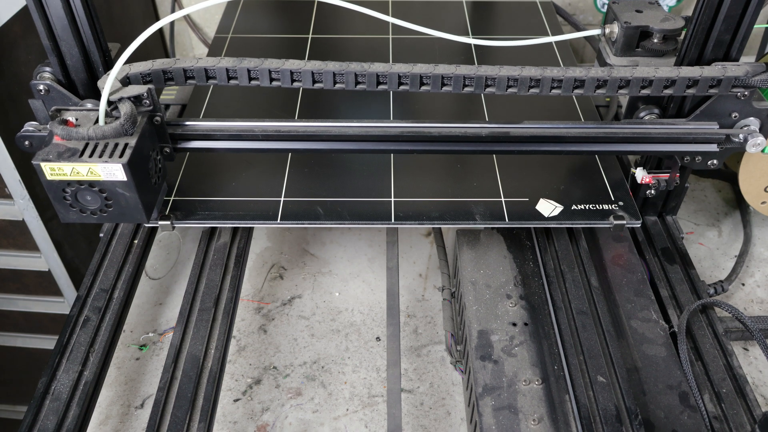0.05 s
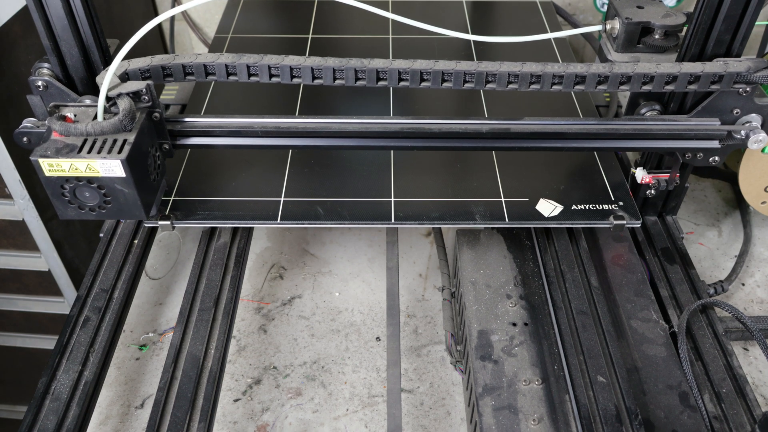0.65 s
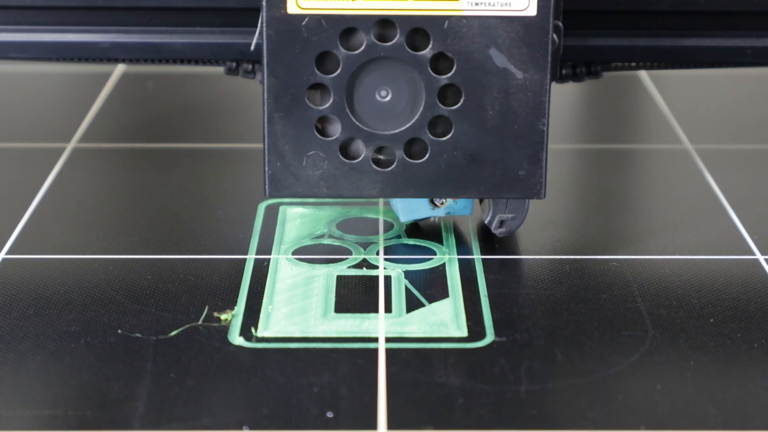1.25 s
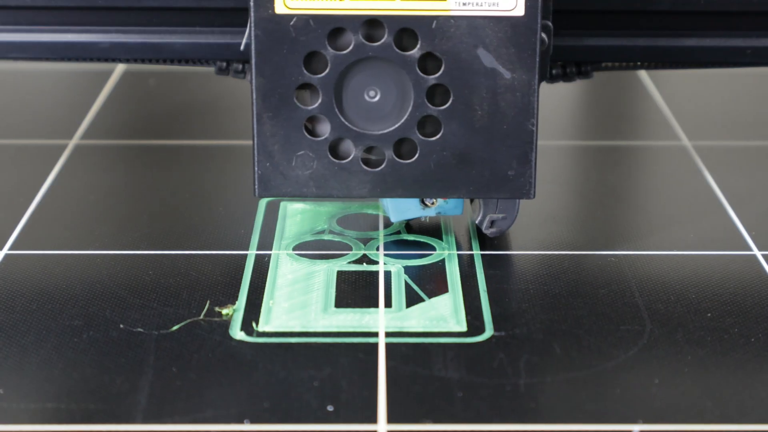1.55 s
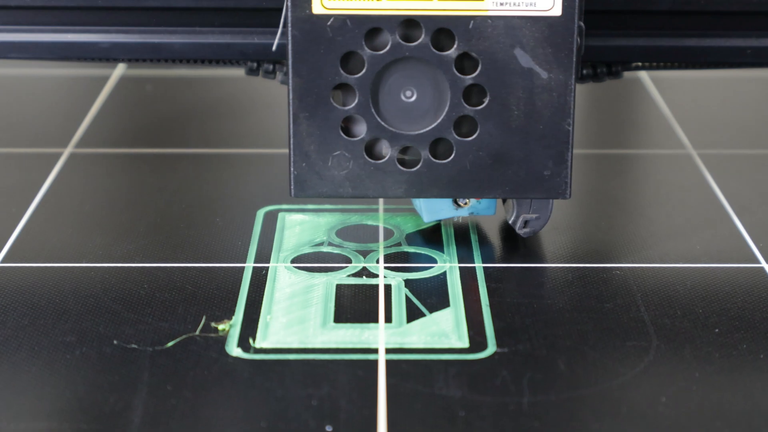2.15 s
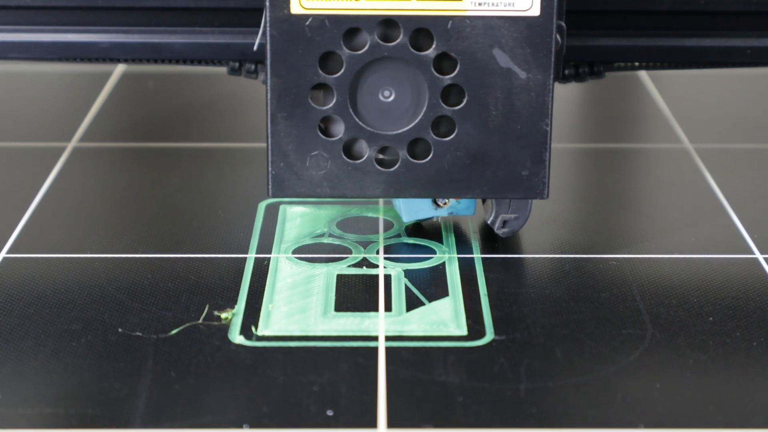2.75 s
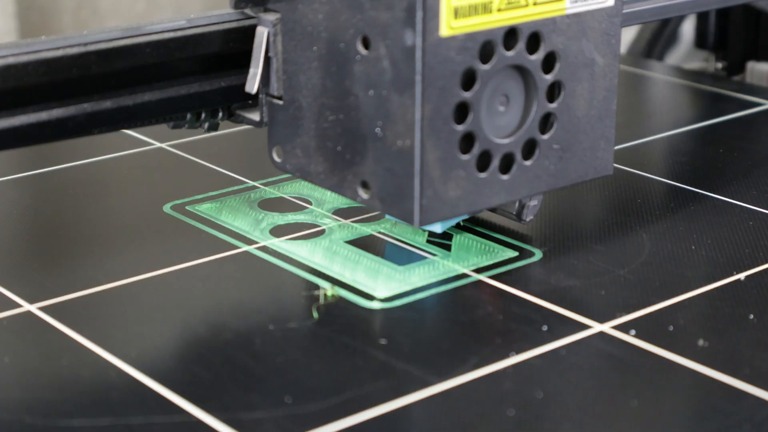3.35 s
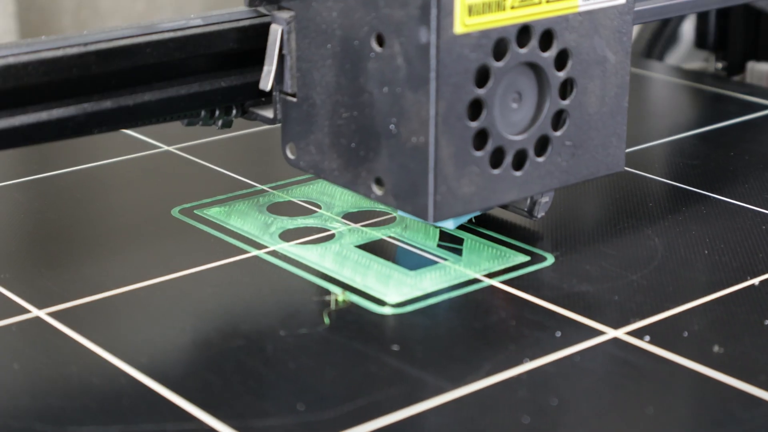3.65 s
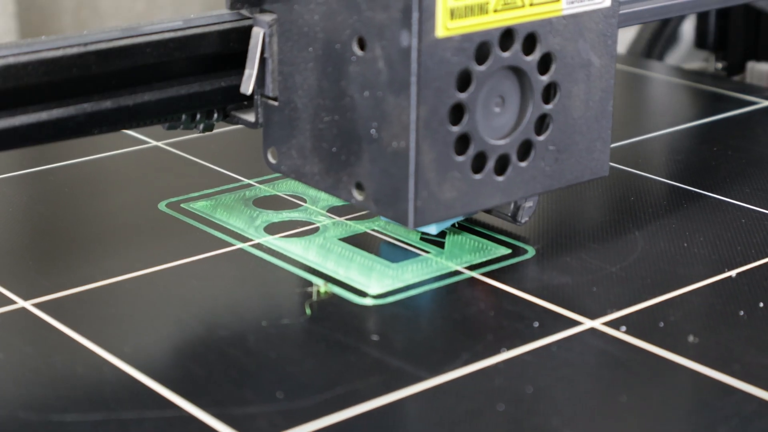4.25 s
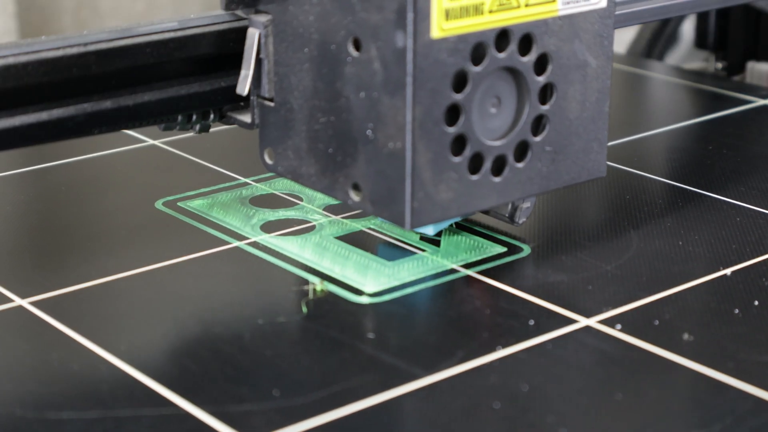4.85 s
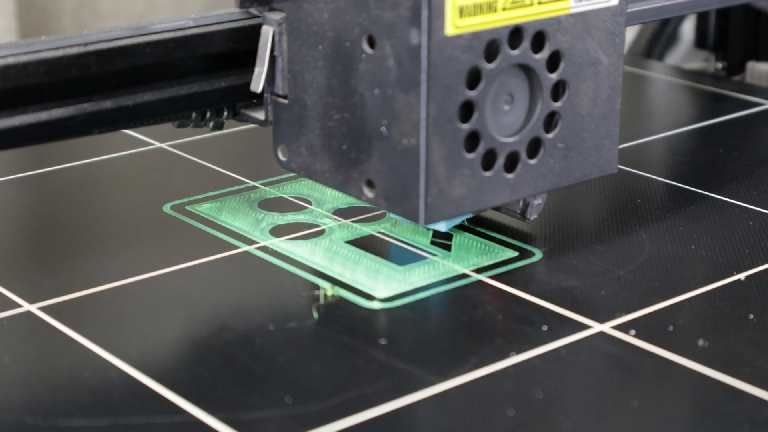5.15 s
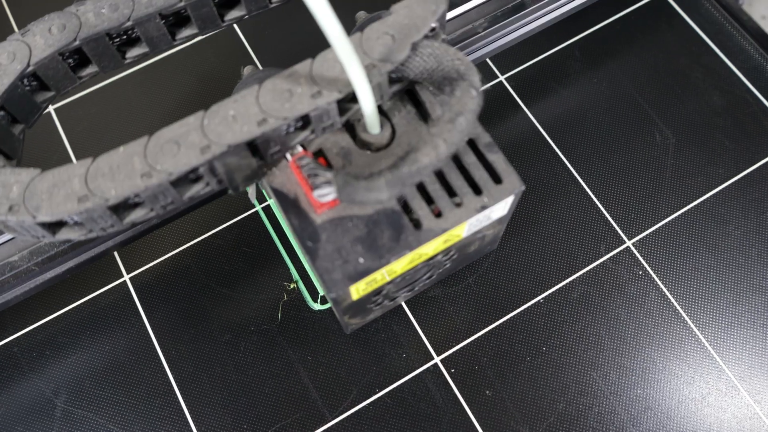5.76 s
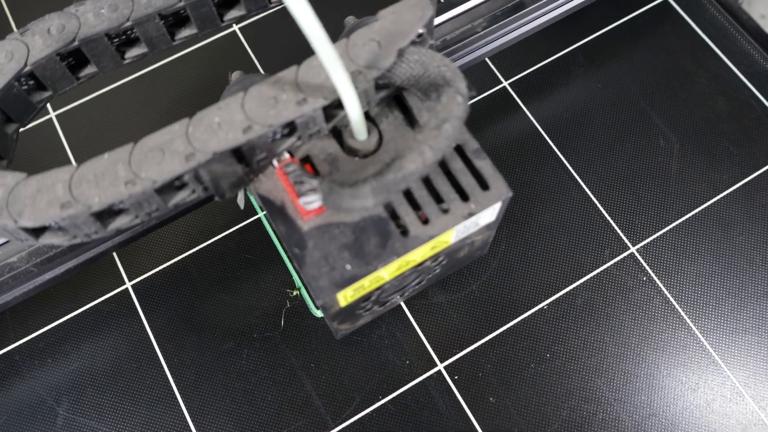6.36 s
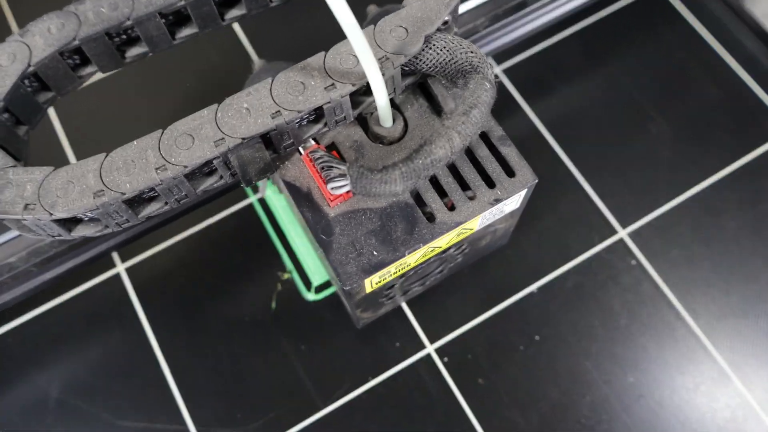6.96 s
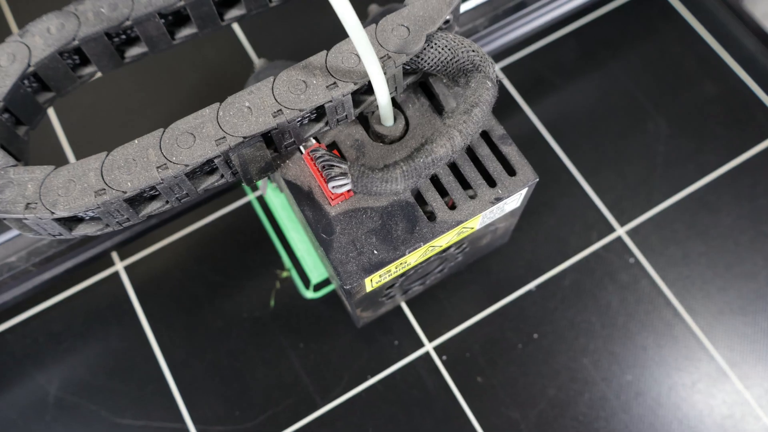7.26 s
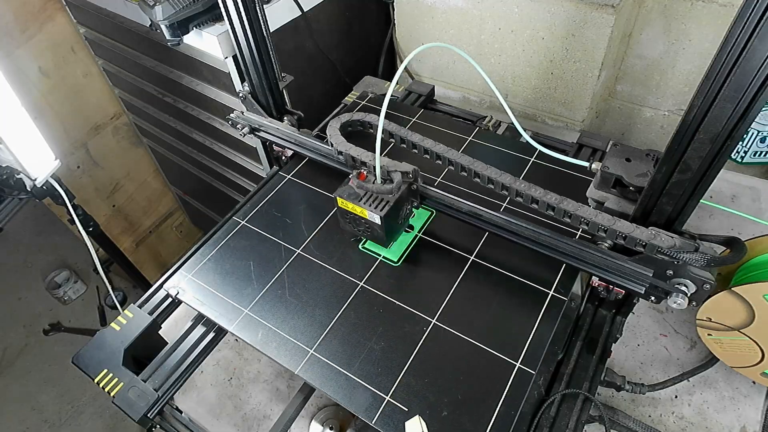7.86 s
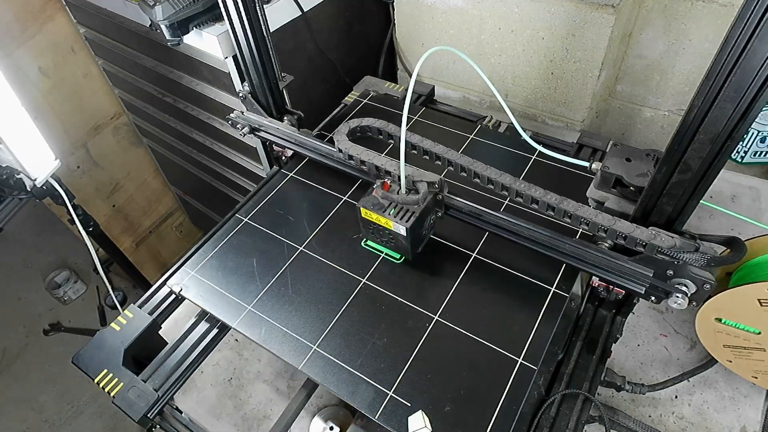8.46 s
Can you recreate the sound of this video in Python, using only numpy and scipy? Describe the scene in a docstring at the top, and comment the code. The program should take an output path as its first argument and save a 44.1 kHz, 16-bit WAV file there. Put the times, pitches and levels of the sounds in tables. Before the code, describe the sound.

A desktop 3D printer works indoors, heard up close, its cooling fans humming and rushing throughout over a low frame rumble. It opens with one fast move of the print head: a high, steady whine that grows louder, with a dull clunk at about 0.55 seconds. At 1 second the whine drops in pitch and ends in a juddering squeak with a brief metallic ring. From 1.2 seconds two stepper motors drone through slow strokes under a thin high whine, dipping at each turn. Loose parts tick unevenly and the housing buzzes faintly. Short chirps and soft knocks mark turns, clearest around 1.6, 5.4, 6.3 and 7.3 seconds. The tone shifts abruptly at 1.2, 3.2 and 5.4 seconds as the listening position changes, with the drone fullest in the last stretch. At 7.8 seconds everything cuts off, leaving silence.

```python
"""A desktop 3D printer at work, its cooling fans humming and rushing all along. First the print head makes one
fast, whining move, clunks halfway and brakes with a squeak at 1 s. From 1.2 s two stepper motors (motors that
turn in tiny jumps) drone through slow strokes and shake the frame; loose parts tick, and the turns bring chirps
and knocks. We listen from four spots, moving on at 1.2, 3.2 and 5.4 s. At 7.8 s the sound breaks off and
silence follows."""
import sys
import numpy as np
from scipy import signal
from scipy.fft import rfft, irfft, next_fast_len
from scipy.io import wavfile
from scipy.ndimage import map_coordinates

SR = 44100
rng = np.random.default_rng(int(sys.argv[2]) if len(sys.argv) > 2 else 0)


def wav_record(signal):
    """Record a signal, one row per channel, as 16-bit PCM in the file named by sys.argv[1]."""
    frames = np.transpose(np.atleast_2d(signal))
    bounded = np.clip(frames, -1, 1)
    # unit amplitude maps onto the largest positive 16-bit level
    quanta = np.round(bounded * 32767).astype(np.int16)
    wavfile.write(sys.argv[1], SR, quanta)


N = 383669

MAIN_STEP_HZ, CROSS_STEP_HZ, TRAVEL_STEP_HZ = 88.35, 141.2, 149.5  # full motor steps a second
MICROSTEPS = 16  # tiny jumps in one full step
BRAKE_AT_S, BRAKE_TAKES_S = .96, .125


# the main motor's low tones: multiple of the step rate, level/dB at spots 2, 3, 4
MAIN_TONES = [(2, -55.5, -62, -53), (3, -52, -53, -42), (4, -51, -50, -44), (5, -53, -65, -53.5),
              (6, -77, -61.5, -58)]
# moments when its fourth harmonic fades: t/s, half width/s, drop/dB
FOURTH_FADES = [(3.78, .15, 10), (4.8, 0.09, 5.5), (5.07, .08, 13), (5.72, 0.13, 16), (6.42, 0.08, 9),
                (6.6, 0.086, 2), (7.2, 0.1, 6)]
# the head slows to turn around: t/s, half width/s, motor drop/dB, hiss drop/dB
TURNAROUNDS = [(1.645, 0.042, 5, 0.5), (2.385, 0.026, 9, 4.5), (3.16, 0.031, 19, 1), (3.85, 0.063, 5, 0),
               (4.72, .05, 3, -1), (5.39, 0.028, 13, 2.5), (6.33, 0.045, 3, 4.5), (7.265, 0.036, 8, 3)]

def main_motor():
    """The main motor drones and whines, getting quieter as the head slows at the end of each stroke."""
    dip_db = bumps((s, width, drop) for s, width, drop, _ in TURNAROUNDS)
    drone = stepper_drone(MAIN_STEP_HZ, MAIN_TONES, drift=.0013, waver_db=1.5,
                          fourth_db=-bumps(FOURTH_FADES))
    return (drone + microstep_whine()) * amp(-dip_db)


# the crosswise motor's tones: multiple of the step rate, level/dB at spots 2, 3, 4
CROSS_TONES = [(1, -63, -56.5, -56), (2, -62.5, -62, -50), (3, -70, -60.5, -58.5), (4, -71, -60, -58),
               (16, -83.5, -81.5, -64.5)]
# diagonal strokes: start/s, end/s, fade-out/s, boost of the lowest tone/dB
DIAGONALS = [(5.52, 5.975, 0.1, 9.5), (6.452, 7.04, 0.443, 11)]

def cross_motor(attack_s=.1):
    """The motor for the crosswise direction drones harder on diagonal strokes."""
    load_db = sum(db * (ramp(start, attack_s) - ramp(end, fade)) for start, end, fade, db in DIAGONALS)
    return stepper_drone(CROSS_STEP_HZ, CROSS_TONES, drift=.00201, waver_db=1, load_db=load_db)


def stepper_drone(step_hz, tones, drift, waver_db, load_db=0, fourth_db=0):
    """Even steps make harmonics, tones at whole multiples of the step rate; the third wavers least."""
    phase = phase_of(step_hz * (1 + drift * wobble(7)))
    out = np.zeros((2, N))
    for k, *levels in tones:
        waver = waver_db * wobble(6) / (2 if k == 3 else 1)
        gain = spot_gain([-np.inf] + levels) * amp(waver + load_db / k ** 2 + fourth_db * (k == 4))
        out += tone(k * phase + rng.uniform(0, 2 * np.pi), k * step_hz, gain)
    return out


# the whine of each stroke: start/s, level/dB at 1, 2, 3, 4, 5 times the microstep rate
STROKE_WHINES = [(1.22, -61, -62.5, -65, -63.5, -85), (1.645, -64, -64, -64, -61, -85),
                 (2.385, -70.5, -65, -59, -63, -85), (3.16, -69.5, -60, -62.5, -63, -70),
                 (3.85, -61, -61.5, -62, -62.5, -72), (4.72, -64.5, -60, -65, -63, -73),
                 (5.39, -57.5, -63, -64.5, -71.5, -85)]

def microstep_whine(drift=.000494, flutter=.00093, waver_db=1.1, rough_db=2):
    """The main motor's tiny jumps sing high up, with a new mix of harmonics on each stroke."""
    hz = MICROSTEPS * MAIN_STEP_HZ
    phase = phase_of(hz * (1 + drift * wobble(7) + flutter * wobble(90)))
    starts, *levels = np.transpose(STROKE_WHINES)
    stroke = np.searchsorted(starts, np.arange(N) / SR)
    out = np.zeros((2, N))
    for k, db in enumerate(levels, 1):
        gain = np.append(0, amp(db))[stroke]  # silent before the first stroke
        out += tone(k * phase, k * hz, gain * amp(waver_db * wobble(6) + rough_db * wobble(50)))
    return out


# tones around the fast move's whine: multiple of the step rate, level/dB
TRAVEL_TONES = [(1, -57), (3, -59), (6, -63.5), (15, -60.5), (17, -63), (18, -70), (19, -67.5), (31, -74.5),
                (32, -52.5), (33, -81), (34, -75), (47.75, -60.5), (48, -58.5), (48.25, -70), (50, -70.5)]
# the whine swells and dips as the gantry (the head's rail) resonates: t/s, half width/s, change/dB
WHINE_SWELLS = [(.11, .055, -10), (.215, 0.022, 5), (.28, .04, -9), (.41, .04, -1), (.545, .028, 3.5),
                (.595, .04, 5.5), (.76, .05, -3.5), (.85, .05, -2.5), (.96, .035, 5.5)]

def fast_move(whine_db=-53.5, growth_db_per_s=8, waver_db=1.8, judder=.012, judder_db=2):
    """A racing motor whines; as the head brakes, the pitch falls, judders and squeaks."""
    speed, braking = travel_speed(), ramp(BRAKE_AT_S, BRAKE_TAKES_S / 10)

    def shake():
        jolts = rng.standard_normal(N // 50 + 2)
        return braking * map_coordinates(jolts, [np.arange(N) / 50], order=1)

    step_hz = TRAVEL_STEP_HZ * speed * (1 + .00036 * wobble(12) + judder * shake())
    phase = phase_of(step_hz)
    drive = speed ** 2.6 * amp(judder_db * shake())  # slower is much quieter
    past_middle_s = np.minimum(np.arange(N) / SR, BRAKE_AT_S) - BRAKE_AT_S / 2
    level_db = whine_db + growth_db_per_s * past_middle_s + bumps(WHINE_SWELLS) + waver_db * wobble(12)
    microstep_hz = MICROSTEPS * step_hz
    # the falling whine sweeps through a sharp resonance of the carriage that holds the head
    squeak_hz, squeak_width_hz = 1930, 76
    squeak = 1 + amp(11) / (1 + ((microstep_hz - squeak_hz) / squeak_width_hz) ** 2)
    out = tone(MICROSTEPS * phase, microstep_hz[0], drive * squeak * amp(level_db))
    octave_db = 4.5 * (ramp(.32, .08) - 1)  # the whine's octave starts soft, then firms up
    overtone_db = -5.5 * braking  # tones above the whine drop once braking starts
    for k, db in TRAVEL_TONES:
        change_db = octave_db * (k == 2 * MICROSTEPS) + overtone_db * (k > MICROSTEPS)
        gain = drive * amp(db + change_db + .5 * wobble(11))
        out += tone(k * phase + rng.uniform(0, 2 * np.pi), k * TRAVEL_STEP_HZ, gain)
    return out


def travel_speed():
    """The fast move's speed: 1 while cruising, then falling evenly to 0."""
    return 1 - ramp(BRAKE_AT_S, BRAKE_TAKES_S)


# the gantry's ringing notes: t/s, f/Hz, level/dB, time to fade by 60 dB/s
GANTRY_NOTES = [(0.97, 4785, -58, .5), (.965, 2392, -52, .4), (.995, 1890, -46, .2), (1, 8000, -57.5, .15)]

def gantry_ring(rise_s=.008):
    """The gantry rings on briefly after the braking whine has swept past its notes."""
    out, t = np.zeros((2, N)), np.arange(SR // 5) / SR
    for s, hz, db, t60 in GANTRY_NOTES:
        add_at(out, s, tone(2 * np.pi * hz * t, hz, amp(db) * strike(t, rise_s, t60)))
    return out


# tone colour of the clunk: f/Hz, relative level/dB
CLUNK_COLOUR = [(350, -2), (550, 0), (880, -2), (1200, -11.5), (2500, -8), (5000, -18.5), (12000, -23.5)]

def clunk(at_s=.556, db=-32.5):
    """Halfway through the fast move something, likely the cable chain, flops with a dull rattle."""
    out, t = np.zeros((2, N)), np.arange(SR // 3) / SR
    add_at(out, at_s, amp(db) * noise(len(t), CLUNK_COLOUR, 300, 13000) * strike(t, rise_s=.019, t60=.25))
    return out


# short motor moves, plus the clunk's ringing body at 0.546 s: t/s, length/s, start f/Hz, end f/Hz, level/dB
CHIRPS = [(0.546, 0.033, 900, 890, -48.5), (1.001, .12, 403, 365, -49.5), (1.03, .19, 165.5, 150, -50.5),
          (1.635, 0.047, 470, 498, -41), (1.661, 0.058, 255, 250, -40), (2.252, 0.076, 380, 272, -47),
          (5.355, 0.075, 249, 262, -37.5), (5.385, 0.061, 484, 503, -39.5), (5.435, 0.055, 408, 390, -44.5),
          (5.441, .055, 240, 255, -43), (6.238, 0.1096, 490.6, 244, -43.5), (6.35, 0.06, 250, 262, -39),
          (7.196, 0.077, 256.5, 248, -36.5), (7.236, .045, 478, 460, -40.5), (7.265, 0.06, 445, 393, -36),
          (7.284, .05, 248, 260, -38.5)]

def motor_chirps():
    """On short moves, mostly at the turns, a motor chirps through the frame's resonances."""
    out = np.zeros((2, N))
    for s, length, start_hz, end_hz, db in CHIRPS:
        size = round(length * SR)
        swell = amp(db) * signal.windows.tukey(size, .7)
        add_at(out, s, tone(phase_of(np.linspace(start_hz, end_hz, size)), start_hz, swell))
    return out


# knocks of belt and carriage: t/s, tick level/dB, thump level/dB, time to fade by 60 dB/s
KNOCKS = [(.474, -60, -36, 0.08), (2.415, -45, -39, 0.16), (3.883, -44.5, -38.5, 0.42),
          (4.683, -38, -37, 0.064), (5.39, -60, -34, 0.17), (5.432, -42.5, -38, 0.11),
          (6.297, -56, -34.5, .26), (7.266, -36.5, -39, .11), (7.285, -46, -32.5, 0.12)]
# tone colours of a knock's tick and thump: f/Hz, relative level/dB
TICK_COLOUR = [(600, -3), (1600, 1), (2500, -11), (3650, -2), (5500, -13.5), (15000, -28.5)]
THUMP_COLOUR = [(40, -38.5), (75, -17.5), (110, -1), (260, 1.5), (450, -4.5), (800, -33.5), (3000, -62)]

def belt_knocks():
    """Belt and carriage knock: a bright tick and a low thump that die away together."""
    out, t = np.zeros((2, N)), np.arange(SR // 4) / SR
    for s, tick_db, thump_db, t60 in KNOCKS:
        tick = amp(tick_db) * noise(len(t), TICK_COLOUR, 500, 15000)
        thump = amp(thump_db) * noise(len(t), THUMP_COLOUR, 40, 3000)
        add_at(out, s, (tick + thump) * strike(t, rise_s=.00049, t60=t60))
    return out


# the notes that loose parts ring at: f/Hz, width/Hz, relative level/dB
LOOSE_PART_NOTES = [(1450, 60, -2), (1970, 90, -5), (2920, 80, -1), (3500, 90, 0), (3820, 80, -9),
                    (4530, 90, -7)]
# clear ticks: t/s, level/dB before the trim, leading f/Hz
CLEAR_TICKS = [(1.2894, -40.5, 2870), (1.6594, -39, 3510), (2.1395, -41.5, 2850), (2.497, -37.5, 3560),
               (2.570, -37, 3600), (2.655, -41, 3420), (2.8494, -39, 2850), (2.932, -38.5, 2980),
               (3.062, -39, 3430), (3.132, -38, 3520), (3.372, -38, 3590), (3.505, -41, 3700),
               (3.657, -39.5, 3630), (3.8935, -36, 3680), (4.1994, -36, 3700), (4.68, -37, 3650),
               (4.9576, -37, 2800), (5.497, -39.5, 3520), (6.121, -32.5, 2940), (6.5016, -39, 2900),
               (6.732, -36, 2930), (6.995, -39, 3480), (7.082, -39, 3500), (7.152, -37, 3480),
               (7.3377, -37, 2890), (7.425, -42, 3550), (7.63, -36, 3500)]
# the softer patter: level/dB before the trim at spots 2, 3, 4
PATTER_DB = [-46.5, -45.5, -41.5]

def carriage_rattle(patter_per_s=26, scatter_db=2, detune=.015, trim_db=-9, bounce_db=-6):
    """Loose parts of the carriage hit, ring and bounce once: clear ticks over an uneven patter."""
    rise_s, t60 = .00092, .085
    out, t = np.zeros((2, N)), np.arange(SR // 10) / SR
    hz = np.geomspace(1000, 10000, 400)
    times = SPOT_TIMES[1] + np.cumsum(rng.uniform(.3, 1.7, 300)) / patter_per_s
    offsets_db = scatter_db * rng.standard_normal(len(times))
    patter = [(s, PATTER_DB[np.searchsorted(SPOT_TIMES, s) - 2] + db, None)
              for s, db in zip(times, offsets_db) if s < SPOT_TIMES[-1]]
    for s, db, lead_hz in list(CLEAR_TICKS) + patter:
        notes = [(f * (1 + detune * rng.normal()), width, level + scatter_db * rng.normal())
                 for f, width, level in LOOSE_PART_NOTES]
        if lead_hz:
            notes.append((lead_hz, 80, 4))  # one extra, stronger note
        ring = noise(len(t), resonances(notes, hz), 1200, 9000)
        flight_s = .012 * rng.uniform(.5, 2)
        bounce = amp(bounce_db) * strike(np.maximum(t - flight_s, 0), rise_s, t60)
        add_at(out, s, amp(db + trim_db) * (strike(t, rise_s, t60) + bounce) * ring)
    return out


# resonances of the head's housing: f/Hz, width/Hz, relative level/dB
HOUSING_NOTES = [(1450, 70, 0.5), (1660, 110, -3), (1970, 60, -3), (2930, 150, 0), (3470, 190, -2),
                 (4480, 220, -8)]
# its buzz: level/dB at spots 1-4
BUZZ_DB = [-78, -66, -59.5, -56]

def housing_buzz(chatter_db=2.5):
    """The motor steps shake the head's housing, which buzzes unevenly."""
    body = noise(N, resonances(HOUSING_NOTES, np.geomspace(1000, 6000, 300)), 1200, 4800)
    return body * spot_gain(BUZZ_DB) * puffs(CROSS_STEP_HZ, depth=1.2) * amp(chatter_db * wobble(45))


# tone colour of the rumble: f/Hz, relative level/dB at spots 1-4
RUMBLE_COLOUR = [(25.05, -102, -95, -95, -96), (41.8, -86.5, -82, -86.5, -89),
                 (81.5, -79.5, -73, -70.5, -79), (102, -66, -66.5, -68.5, -66.5),
                 (156.5, -74, -71, -72.5, -72.5), (230, -74.5, -72, -71, -72),
                 (335, -74.5, -70, -72.5, -64.5), (470, -74, -68.5, -69.5, -64),
                 (540, -76.5, -72, -73, -70.5), (934, -81.5, -73, -75.5, -77.5)]
# the whole rumble: level/dB at spots 1-4
RUMBLE_DB = [-45.5, -42.5, -42.5, -42]

def frame_rumble(shake_db=.7):
    """Belts and rollers rumble through the frame."""
    return spot_gain(RUMBLE_DB) * amp(shake_db * wobble(30)) * spot_noise(RUMBLE_COLOUR, 24, 876)


# steady tones of fans and housing: f/Hz, level/dB at spots 1-4
FAN_TONES = [(55.3, -60.5, -60.5, -64, -63), (108.7, -57, -55.5, -63.5, -56), (192, -57.5, -55.5, -66, -57),
             (313.2, -57, -61.5, -65.5, -54.5), (322.4, -62, -57, -58.5, -61),
             (467.8, -65, -56, -53, -48.5), (731.3, -55, -58, -51.5, -77), (755, -83.5, -70, -76.5, -62),
             (1066, -81, -58, -59, -87.5), (1301, -73.5, -62.5, -64, -67), (1520, -77, -56.5, -82, -69),
             (1598, -84, -55, -83.5, -78.5), (1624, -59, -81.5, -61, -77), (1890, -67.5, -61.5, -60, -57.5),
             (1946, -57.5, -73, -79, -84), (2270, -85.5, -74, -73.5, -68), (3720, -91.5, -80.5, -66, -81.5),
             (3950, -86, -92.5, -78, -66), (4204, -76, -77.5, -64, -84.5)]
# faint upper fan tones, each heard from one spot: spot (1-4), f/Hz, level/dB
FAN_OVERTONES = [(1, 851, -65), (1, 1238, -67), (1, 1443, -62), (1, 1647, -64), (1, 2078, -66),
                 (3, 3391, -69.5), (3, 3677, -65), (3, 3919, -67.5), (4, 1044, -67), (4, 1610, -68),
                 (4, 1976, -67), (4, 3801, -71), (4, 4522, -71)]

def fan_hum(drift_hz=.73, overtone_drift_hz=2, waver_db=1.26):
    """The spinning fans hum; each tone drifts and wavers a little on its own."""
    out = np.zeros((2, N))
    for hz, *levels in FAN_TONES:
        phase = phase_of(hz + drift_hz * wobble(5))
        out += tone(phase, hz, spot_gain(levels) * amp(waver_db * wobble(5.5)))
    for spot, hz, db in FAN_OVERTONES:
        part = spot_slice(round(spot))
        phase = phase_of(hz + overtone_drift_hz * wobble(12)[part])
        out[:, part] += tone(phase, hz, amp(db + waver_db * wobble(5.5)[part]))
    return out


# tone colour of the moving air: f/Hz, relative level/dB at spots 1-4
AIR_COLOUR = [(900, -82.5, -79, -75.5, -77), (1200, -80.5, -77, -78, -81), (1600, -82, -78, -76.5, -76.5),
              (1900, -81, -73.5, -71.5, -79), (2230, -82, -78, -78, -77.5), (2570, -89.5, -83, -82, -82),
              (2970, -86, -82.5, -82, -81), (3140, -89.5, -83, -83.5, -82.5),
              (3430, -87.5, -83, -82, -84.5), (4460, -91.5, -85, -83.5, -84.5),
              (5170, -92, -87, -85.5, -90.5), (8500, -95, -89, -89, -93), (11500, -99, -91, -93, -96.5),
              (15500, -100.5, -93.5, -95, -96.5)]
# the fans' rush and the jet's hiss: base level/dB at spots 1-4
RUSH_DB = [-48, -46.5, -45, -48]
HISS_DB = [-58, -55, -53.5, -54]
# the jet swells over the print's walls and sinks over a hollow: t/s, half width/s, change/dB
JET_PASSES = [(1.39, 0.067, 4), (1.54, 0.065, 6.5), (2.85, 0.13, 1.5), (2.98, 0.068, 3.5), (3.12, 0.063, 4),
              (3.28, 0.059, -5), (4.16, 0.17, 2), (4.44, .13, 2.5), (5.9, 0.21, 3.5), (6.17, 0.13, 1.5),
              (7.78, 0.18, 3.5)]

def fan_air(fan_turn_hz=141.3, gust_db=.88, flutter_db=1.04):
    """The fans rush; the nozzle's air jet hisses, puffs once per fan turn and sinks at most turns."""
    speed = travel_speed()  # on the fast move the rush is softer and the rollers add hiss
    jet_db = bumps(JET_PASSES) - bumps((s, width, drop) for s, width, _, drop in TURNAROUNDS)
    rush_change_db = .23 * jet_db - 1.16 * speed + gust_db * wobble(40)
    hiss_change_db = jet_db + 1.5 * speed + flutter_db * (wobble(18) + wobble(65))
    rush = spot_gain(RUSH_DB) * amp(rush_change_db) * spot_noise(AIR_COLOUR, 907, 5300)
    hiss = spot_gain(HISS_DB) * amp(hiss_change_db) * spot_noise(AIR_COLOUR, 5120, 18000)
    return rush + hiss * puffs(fan_turn_hz, depth=.24)


# faint whistles: start/s, end/s, fade/s, f/Hz, pitch jitter/Hz, level/dB
WHISTLES = [(2.45, 3.189, .15, 8330, 200, -66), (3.18, 3.46, .05, 2834, 45, -62.5),
            (3.3, 5.4, .25, 8877, 36, -66.5), (3.45, 5.42, 0.13, 4775, 5, -65)]

def whistles(waver_db=2):
    """Air and rollers make thin, fuzzy whistles that fade in and out."""
    out = np.zeros((2, N))
    for start, end, fade, hz, jitter_hz, db in WHISTLES:
        phase = phase_of(hz + jitter_hz * wobble(120))
        swell = ramp(start, fade) - ramp(end - fade, fade)
        out += tone(phase, hz, swell * amp(db + waver_db * wobble(12)))
    return out


def room_echo(sound, db=-11, t60=.4, delay_s=.012):
    """The room answers a sound with a short, blurred tail."""
    t = np.arange(SR // 3) / SR
    tail = rng.standard_normal((2, len(t))) * amp(-60 * t / t60) * (t > delay_s)
    return amp(db) * signal.fftconvolve(sound, tail / np.linalg.norm(tail[0]), axes=1)[:, :N]


# when each of the four listening spots begins, and when the last ends: t/s
SPOT_TIMES = [0, 1.22, 3.195, 5.362, 7.797]

def spot_slice(spot):
    """The samples heard from one listening spot (1-4)."""
    return slice(round(SPOT_TIMES[spot - 1] * SR), round(SPOT_TIMES[spot] * SR))


def spot_gain(levels_db):
    """A gain that jumps to a new level at each spot."""
    gain = np.zeros(N)
    for spot, db in enumerate(levels_db, 1):
        gain[spot_slice(spot)] = amp(db)
    return gain


def spot_noise(colours, lo_hz, hi_hz):
    """Noise that takes a new tone colour at each spot."""
    out = np.zeros((2, N))
    for spot in range(1, len(SPOT_TIMES)):
        part = spot_slice(spot)
        out[:, part] = noise(part.stop - part.start, np.array(colours)[:, [0, spot]], lo_hz, hi_hz)
    return out


# how wide the sound is: f/Hz, side minus mid level/dB
STEREO_WIDTH = [(60, -20.5), (380, -20.5), (700, -11), (1290, -7.5), (2380, -7.5), (4400, -3), (8120, 0),
                (12000, 2), (15000, 6)]
# which way it leans: f/Hz, left minus right level/dB
STEREO_LEAN = [(150, 1), (350, 0), (700, -3), (3000, -2), (15000, -2)]

def stereo(mid, side, hz):
    """Left and right from what both ears share (mid) and what sets them apart (side)."""
    side = side * amp(read_curve(STEREO_WIDTH, hz))
    lean = amp(read_curve(STEREO_LEAN, hz) / 2)
    return np.array([(mid + side) * lean, (mid - side) / lean])


def tone(phase, hz, gain):
    """A pure stereo tone that reaches the left ear first."""
    return np.sqrt(2) * gain * stereo(np.sin(phase), np.cos(phase), hz)


def noise(size, colour, lo_hz, hi_hz):
    """Stereo noise of strength 1 with a given tone colour between steep band edges."""
    m = next_fast_len(size + 4096)
    hz = np.fft.rfftfreq(m, 1 / SR) + 1
    band = ((1 + (lo_hz / hz) ** 16) * (1 + (hz / hi_hz) ** 16)) ** -.5
    mid, side = rfft(rng.standard_normal((2, m))) * amp(read_curve(colour, hz)) * band
    pair = irfft(stereo(mid, side, hz), m)[:, :size]
    return pair / np.std(pair.mean(axis=0))


def resonances(notes, hz):
    """A tone colour with one peak for each (f/Hz, width/Hz, level/dB) note."""
    power = sum(amp(db) ** 2 / (1 + ((hz - centre) / width) ** 2) ** 2 for centre, width, db in notes)
    return np.column_stack([hz, 10 * np.log10(power)])


def puffs(rate_hz, depth):
    """A gain that puffs once per cycle and keeps the average power."""
    gain = 1 + depth * (.5 + .5 * np.cos(phase_of(rate_hz + .5 * wobble(5)))) ** 8
    return gain / np.sqrt(np.mean(gain ** 2))


def strike(t, rise_s, t60):
    """The shape of a hit: a quick rise, and a fade of 60 dB every t60 seconds."""
    return amp(-60 * t / t60) * (1 - np.exp(-t / rise_s))


def wobble(rate):
    """A smooth random curve through about `rate` values a second."""
    coarse = np.linspace(0, N / SR * rate, 2000)
    curve = map_coordinates(rng.standard_normal(600), [coarse], mode="wrap")
    return np.interp(np.arange(N), np.linspace(0, N, len(coarse)), curve)


def bumps(rows):
    """Bell-shaped swells added up, one for each (t/s, half width/s, height) row."""
    t = np.arange(N) / SR
    return sum(height * np.exp(-((t - s) / width) ** 2) for s, width, height in rows)


def ramp(start, length):
    """0 before start, rising evenly to 1 over length seconds."""
    return np.clip((np.arange(N) / SR - start) / length, 0, 1)


def phase_of(hz):
    """The running angle of a wave whose pitch is given per sample."""
    return 2 * np.pi * np.cumsum(hz) / SR


def read_curve(points, hz):
    """Read between (f/Hz, value) points, with octaves evenly spaced."""
    f, values = np.transpose(points)
    return np.interp(np.log(hz + 1), np.log(f + 1), values)


def add_at(out, s, sound):
    """Mix a short sound in at s seconds."""
    out[:, round(s * SR):][:, :sound.shape[1]] += sound


def amp(db):
    """Decibels to gain."""
    return 10 ** (np.asarray(db) / 20)


def scene():
    """Motors, moving parts and fans together; only the braking whine echoes in the room."""
    motors = main_motor() + cross_motor()
    whine = fast_move()
    braking = room_echo(whine * (travel_speed() < 1)) + gantry_ring()
    parts = clunk() + motor_chirps() + belt_knocks() + carriage_rattle() + housing_buzz()
    background = frame_rumble() + fan_hum() + fan_air() + whistles()
    return motors + whine + braking + parts + background


def record(dry, fade_s=.01, top_hz=15950):
    """Stop the sound dead at the end of the last spot and remove the very highest treble."""
    m = next_fast_len(N + SR // 2)
    stopped = dry * (1 - ramp(SPOT_TIMES[-1] - fade_s, fade_s))
    low_pass = 1 / (1 + (np.fft.rfftfreq(m, 1 / SR) / top_hz) ** 400)
    return irfft(rfft(stopped, m) * low_pass, m)[:, :N]


dry = scene()
out = record(dry)
wav_record(out)
```